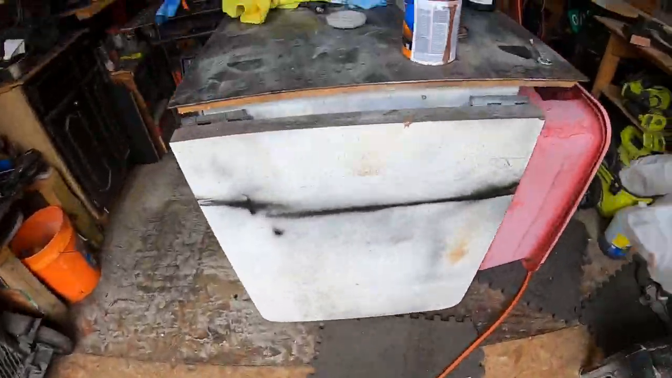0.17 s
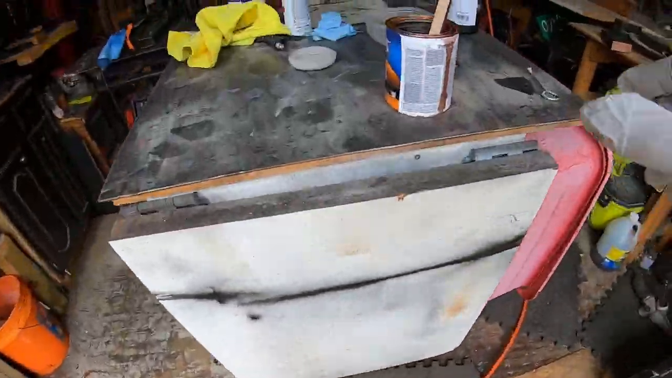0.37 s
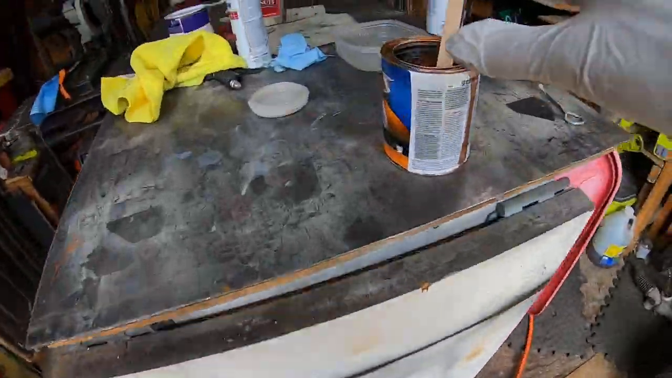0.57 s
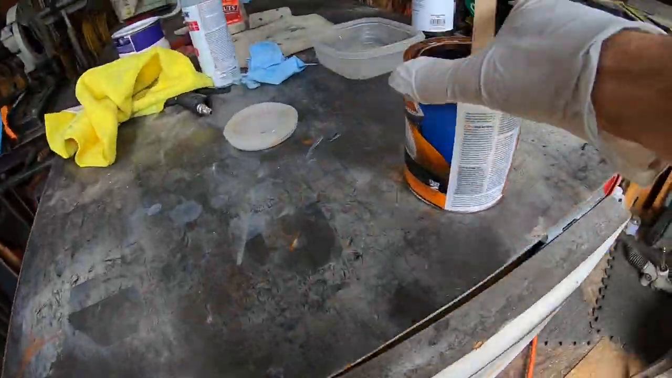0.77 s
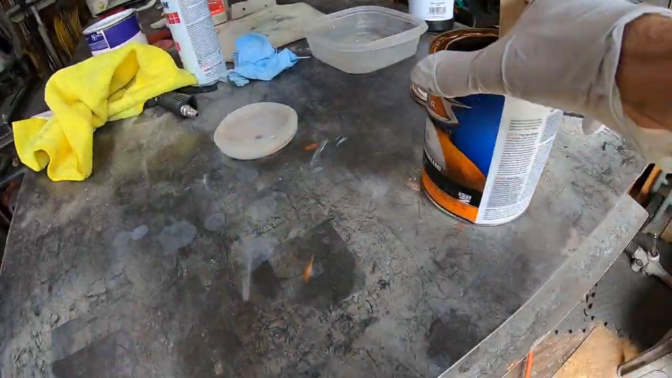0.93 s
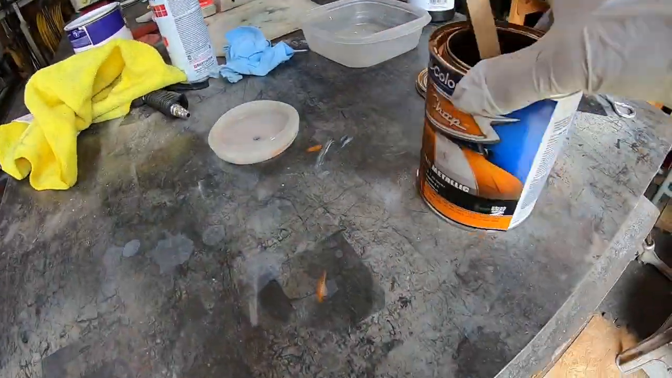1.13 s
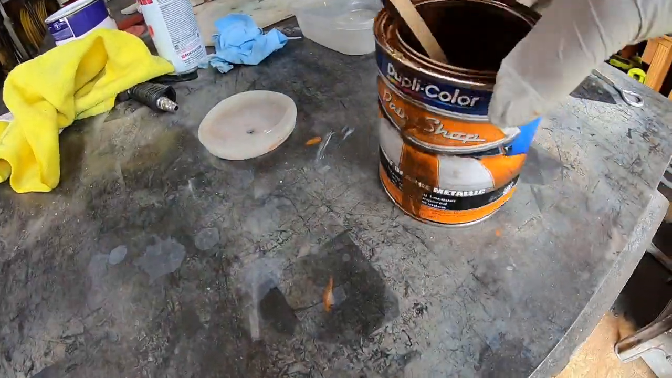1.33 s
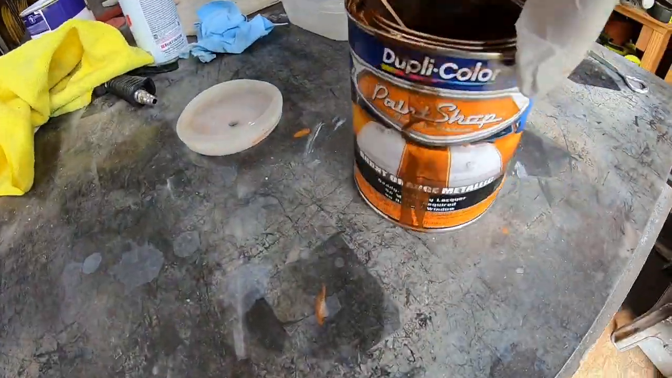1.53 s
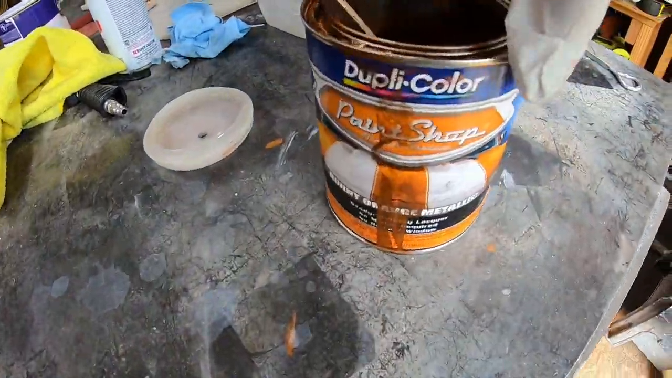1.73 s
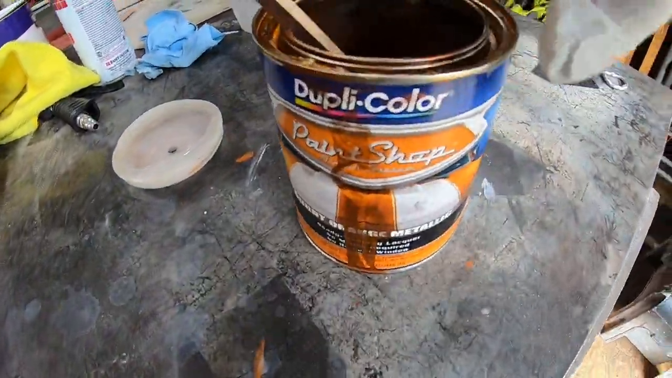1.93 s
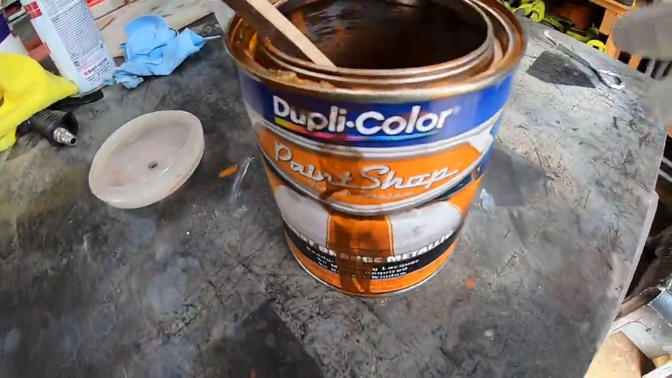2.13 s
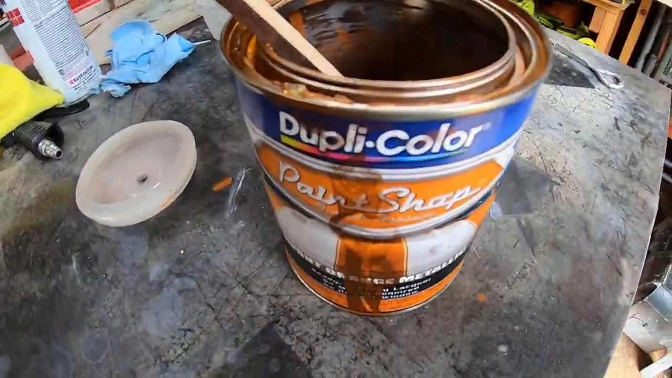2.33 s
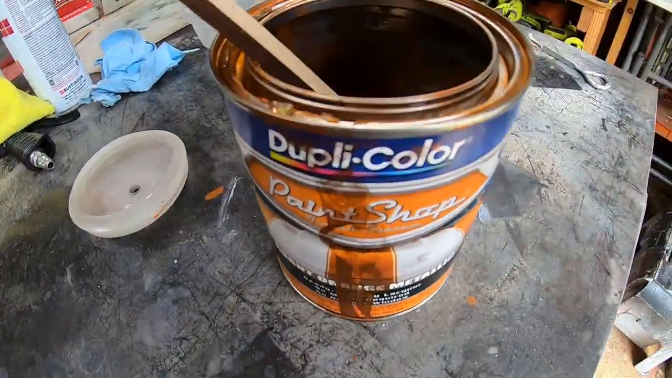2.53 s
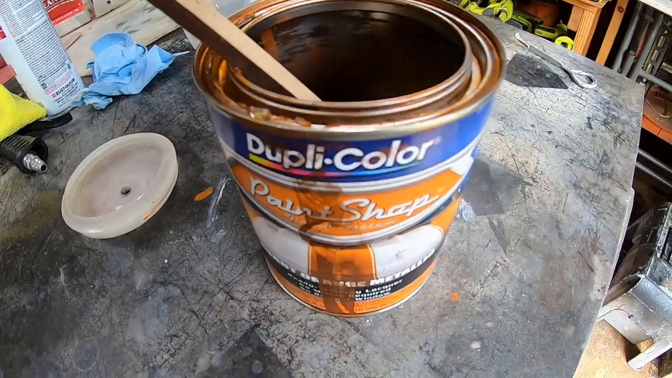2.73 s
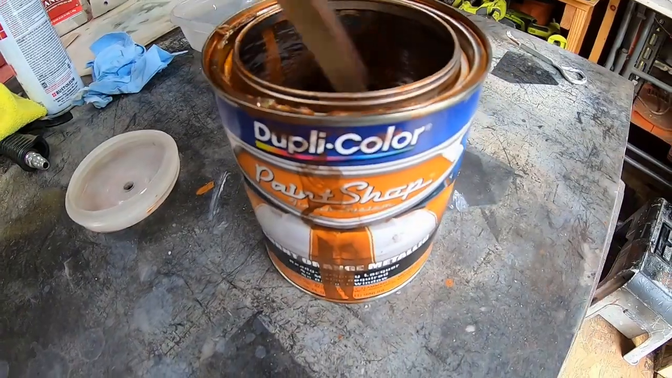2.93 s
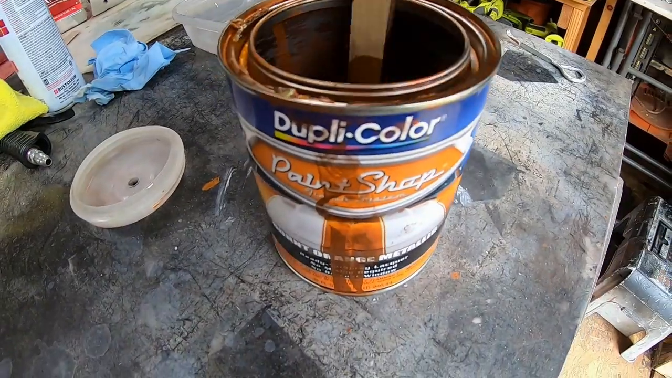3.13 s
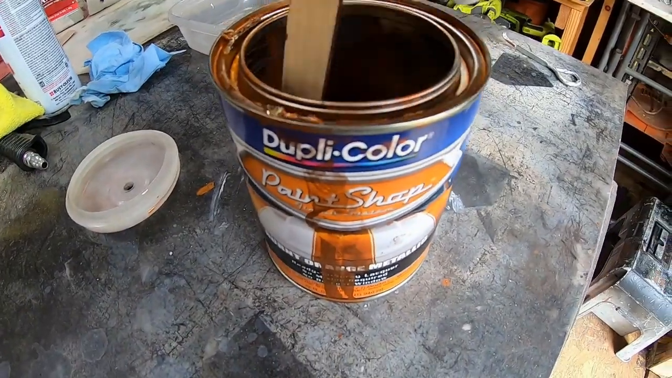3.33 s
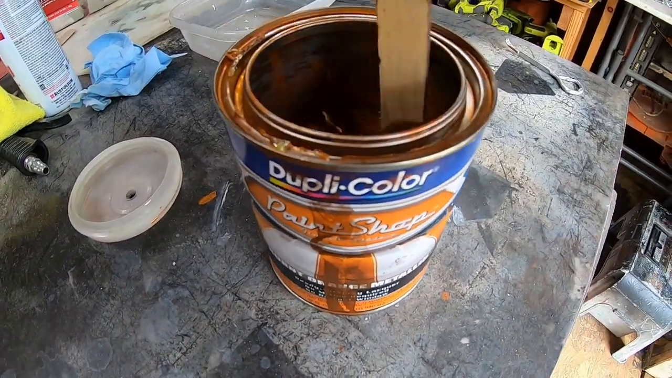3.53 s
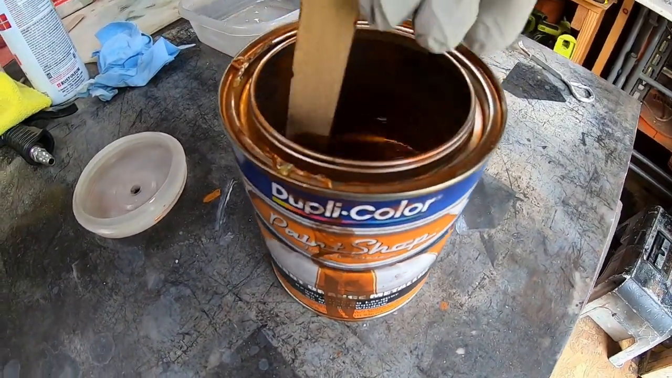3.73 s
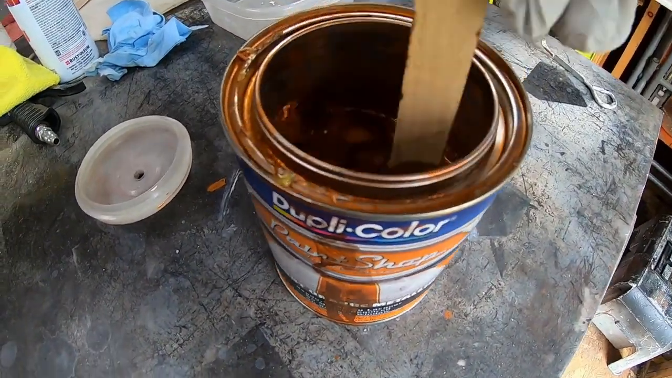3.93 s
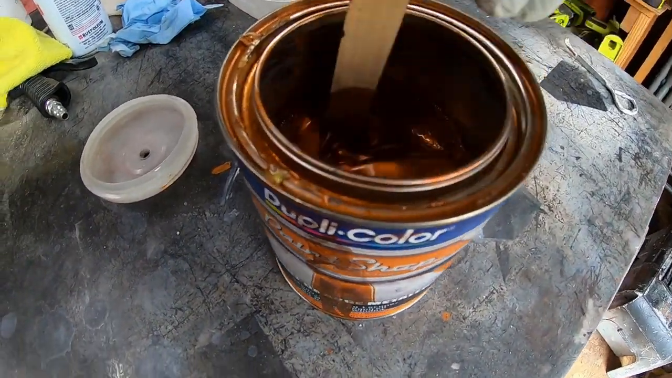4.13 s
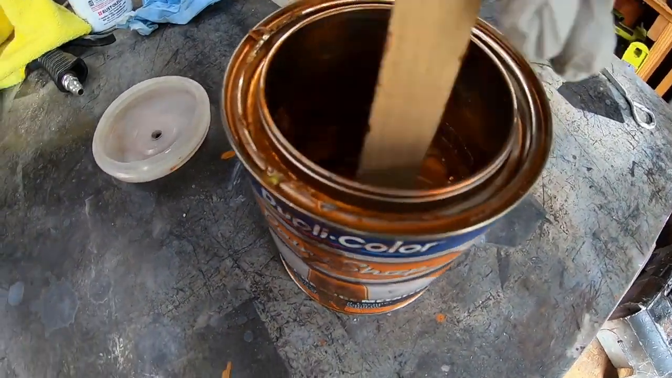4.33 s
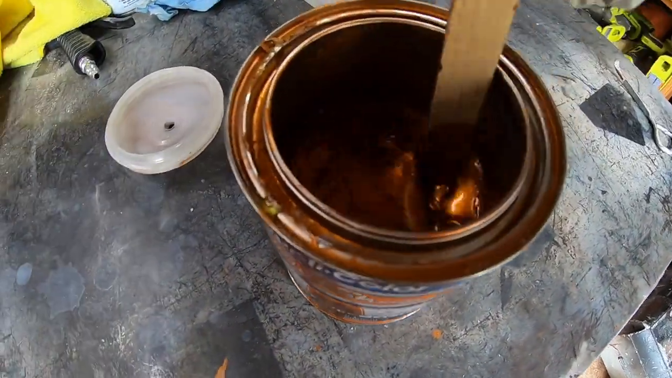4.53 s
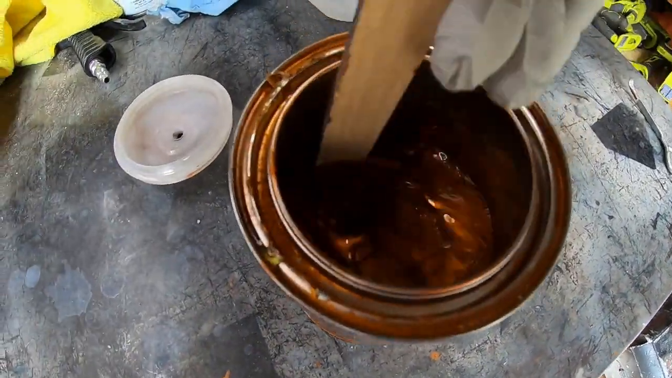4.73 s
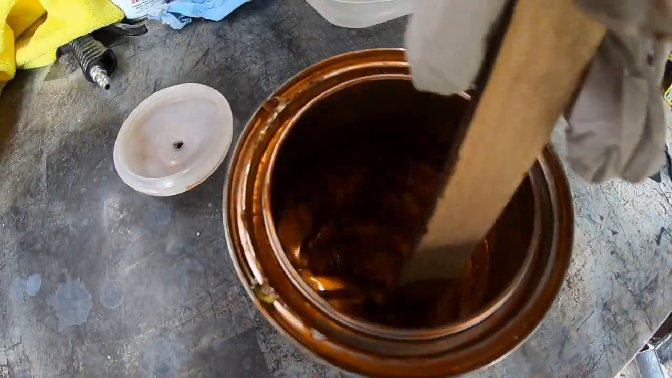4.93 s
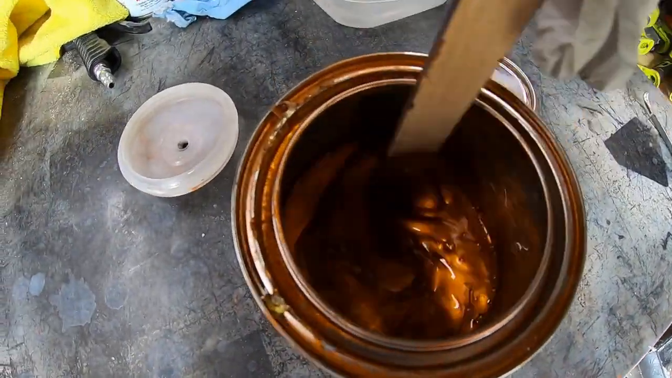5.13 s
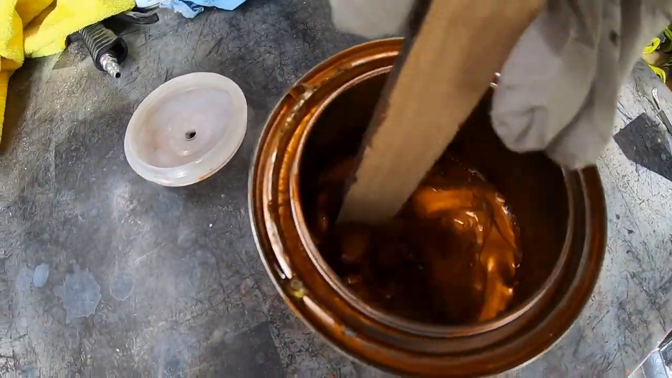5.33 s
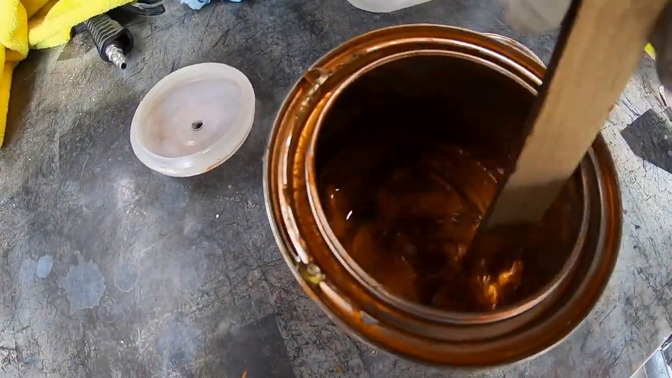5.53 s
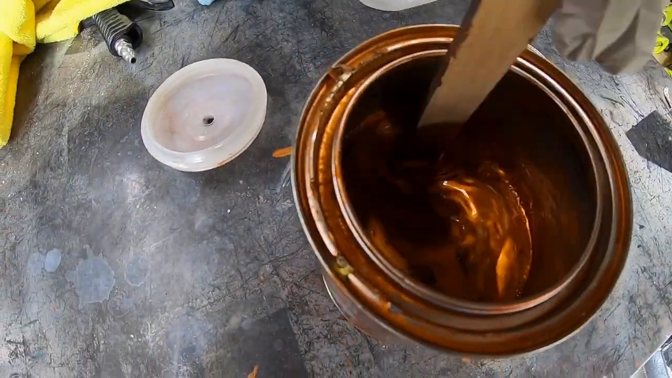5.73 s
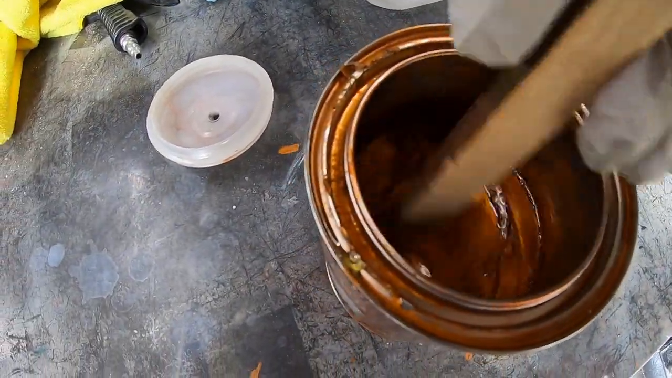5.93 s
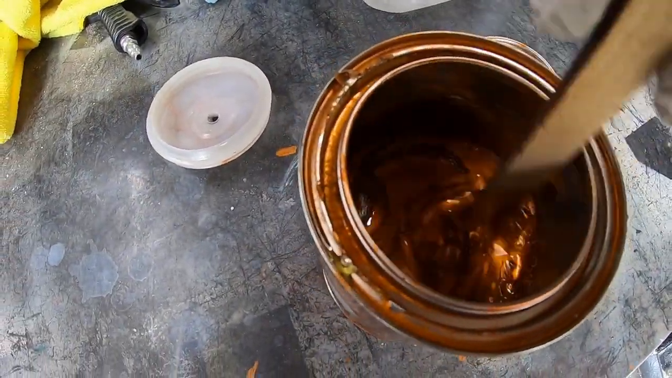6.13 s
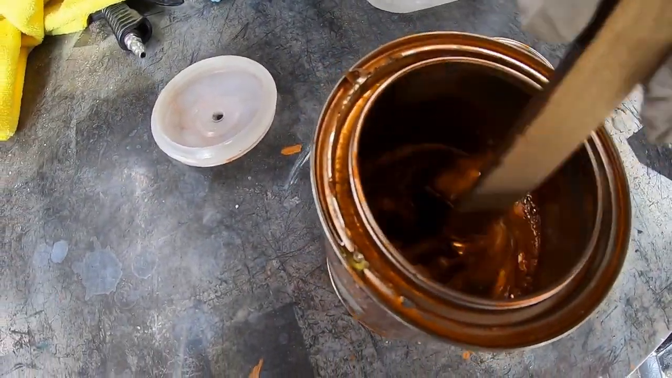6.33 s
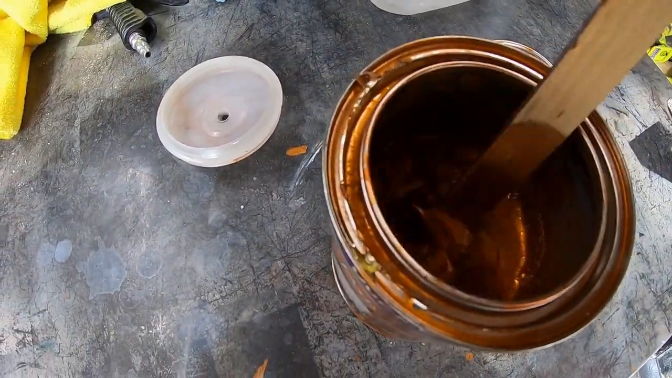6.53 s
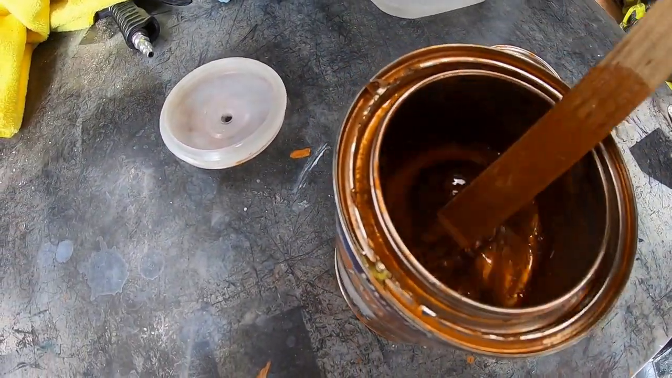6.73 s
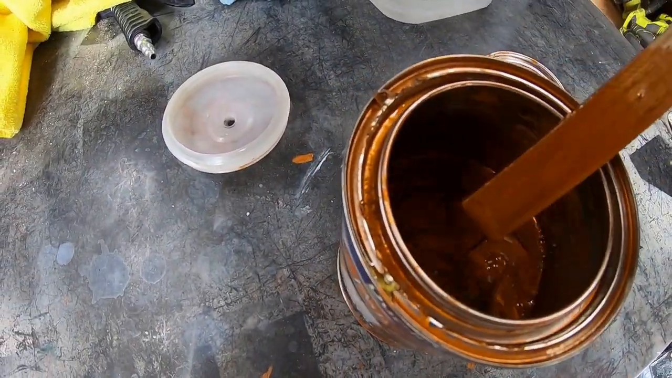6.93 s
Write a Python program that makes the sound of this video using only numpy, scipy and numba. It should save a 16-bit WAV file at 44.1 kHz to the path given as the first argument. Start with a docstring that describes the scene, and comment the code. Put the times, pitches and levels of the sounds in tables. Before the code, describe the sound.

In a garage with a faint low hum, cloth rustles and dull bumps lead to a gloved hand rubbing a metal paint tin. The tin grates over a gritty bench in short ringing shoves, then nearly a second of quiet follows. A wooden stick then stirs thick paint, scraping the inner wall in rhythmic hollow strokes with woody knocks, squelches and sticky pops. Close microphone, small dull room.

```python
"""Garage: a tin of thick paint is dragged across a workbench, then stirred with a wooden stick.
Stick-slip friction, shaped by resonances of the tin and its air, makes the scrapes, drags and rubs.
Decaying modes make the knocks on the tin; gliding sinusoids make the air pockets that pop in the paint.
A glove rubs, clothes rustle and dull bumps sound over a low room hum with a faint hiss and whine."""
import sys
import numpy as np
from scipy import signal
from scipy.fft import rfft, irfft, next_fast_len
from scipy.io import wavfile
from numba import njit

SR = 44100
rng = np.random.default_rng(int(sys.argv[2]) if len(sys.argv) > 2 else 0)


def to_wav(sig):
    """Store sig (one row per channel, or 1-D mono) as 16-bit WAV at the path in sys.argv[1].

    Samples outside -1..1 are clipped; the rate is SR.
    """
    pcm = np.clip(np.atleast_2d(sig), -1, 1) * 32767
    pcm = np.round(pcm).astype(np.int16)
    wavfile.write(sys.argv[1], SR, pcm.T)  # frames by channels


N = 308499
TIME = np.arange(N) / SR
AGE = TIME[:16384]  # time since the onset of a short sound, s

# resonances of the air in the tin: f/Hz, width/Hz, level from the side/dB, level from above/dB
AIR_MODES = [(725, 24, 16.5, 14.5), (1094, 23, 4.5, 12.5), (1378, 46, 16, 6.5), (1847, 69, 13, 12.5),
             (2334, 58, -5.5, 7.5), (2890, 73, 6.5, 7.5), (3350, 57, -3.5, 3.5), (3930, 99, 8, 2),
             (4755, 82, 9.5, 0), (5720, 68, 5, 3), (7500, 62, -12.5, 2)]
# resonances of the tin's bottom: f/Hz, width/Hz, level/dB
BOTTOM_MODES = [(660, 105, 9), (1793, 41, 20), (2525, 60, 11), (2926, 31, 14), (3260, 60, 12.5),
                (3900, 46, 10.5), (4660, 57, 4), (6040, 73, 5)]
# strokes of the stick along the wall: t/s, length/s, relative level/dB, hollow mid-range re that level/dB
WALL_STROKES = [(2.985, 0.082, -60, 6), (3.056, 0.28, -72.5, 8), (3.23, 0.056, -50.5, 10),
                (3.385, 0.44, -55.5, 7.5), (3.51, 0.051, -53.5, 8), (3.63, 0.051, -46.5, 2.5),
                (3.685, 0.091, -50.5, 5.5), (3.795, 0.023, -62, 4.5), (3.885, 0.012, -53, 2.5),
                (3.925, 0.3, -58.5, 8), (4.079, 0.087, -48.5, 0.5), (4.19, 0.12, -61.5, 8.5),
                (4.314, 0.053, -51.5, 5), (4.417, 0.095, -55, 11), (4.517, 0.087, -56.5, 7.5),
                (4.591, 0.19, -48, 5.5), (4.861, 0.073, -51.5, 3), (4.978, 0.11, -53, 4.5),
                (5.101, 0.12, -57, 8), (5.161, 0.057, -47.5, 2), (5.226, 0.15, -54, 5),
                (5.402, .13, -56, 7), (5.544, 0.059, -49.5, 7), (5.62, 0.16, -42.5, 2.5),
                (5.814, 0.075, -47, 5.5), (5.927, 0.06, -52, 0), (6.05, 0.088, -55, 4),
                (6.1, 0.058, -48, 5.5), (6.147, 0.14, -54.5, 7), (6.27, 0.13, -49, -1.5),
                (6.43, 0.1, -52, 6), (6.488, 0.022, -37, -8), (6.61, 0.02, -60.5, 0)]


def undb(db):
    """Amplitude gain is 10 to the power of level/20."""
    return 10 ** (np.asarray(db) / 20)


def unit(x):
    """Normalisation to a root-mean-square of 1."""
    return x / np.sqrt(np.mean(x ** 2))


def curve(rows):
    """Linear interpolation between (t/s, value) points."""
    return np.interp(TIME, *np.transpose(rows))


def colour(x, points):
    """Minimum-phase filtering: the folded cepstrum of the (f/Hz, level/dB) curve gives a causal response."""
    size = next_fast_len(len(x) + 2048, True) // 2 * 2
    hz, db = np.transpose(points)
    grid = np.maximum(np.arange(size // 2 + 1) * SR / size, 1)
    log_gain = np.log(undb(np.interp(np.log(grid), np.log(hz), db)))
    cepstrum = irfft(log_gain)
    cepstrum[1:size // 2] *= 2
    cepstrum[size // 2 + 1:] = 0
    response = np.exp(rfft(cepstrum))
    return irfft(rfft(x, size) * response)[:len(x)]


def walk(rate):
    """Random modulation, slow or fast with the rate in knots/s: Gaussian knots joined by lines, spread near 1."""
    knots = rng.standard_normal(8192)
    return np.interp(TIME * rate, np.arange(len(knots)), knots) * np.sqrt(3 / 2)


def pan(x, db):
    """Intensity stereo: the left-minus-right level difference places a mono sound."""
    return np.array([x * undb(db / 2), x * undb(-db / 2)])


def add(track, s, sound):
    """Linear superposition of a sound that starts at s."""
    start = max(int(s * SR), 0)
    track[..., start:start + sound.shape[-1]] += sound[..., :N - start]


@njit
def resonate(x, hz, width):
    """Second-order resonance as a state-variable band-pass: movable centre, unit gain at the centre."""
    y, band, low = np.empty(len(x)), 0., 0.
    for i in range(len(x)):
        g, damping = np.tan(np.pi * hz[i] / SR), width / hz[i]
        v = (band + g * (x[i] - low)) / (1 + g * (g + damping))
        band, low, y[i] = 2 * v - band, low + 2 * g * v, damping * v
    return y


def narrow_noise(hz, width):
    """Band-limited noise: two equal resonances in cascade, the more tonal the narrower they are."""
    once = resonate(rng.standard_normal(len(hz)), hz, width)
    return unit(resonate(once, hz, width))


def friction(grit_db, judder_db, judder_rate):
    """Stick-slip excitation: noise whose level wanders quickly (grit) and slowly (judder) bunches the slips."""
    level_db = grit_db * walk(1100) + judder_db * walk(judder_rate)
    return unit(rng.standard_normal(N) * undb(level_db))


def effort(rows, attack_s, release_s, swell_db):
    """Powers of (t/s, length/s, level/dB) movements add; each sets in, swells (or dips) mid-way and decays."""
    power, age = np.zeros(N), TIME[:SR]
    for s, length_s, db in rows:
        swell = undb(swell_db * (np.sin(np.pi * np.minimum(age / length_s, 1)) - 0.5))
        shape = np.minimum(age / attack_s, 1) * swell * np.exp(-np.maximum(age - length_s, 0) / release_s)
        add(power, s, (undb(db) * shape) ** 2)
    return np.sqrt(power)


def stirring():
    """Friction grows with hand pressure: gains for the hiss at the wall and for the hollow of the tin."""
    s, length_s, db, hollow_db = np.transpose(WALL_STROKES)
    # a positive swell: the hand presses hardest in mid-stroke
    return [effort(zip(s, length_s, level), attack_s=0.011, release_s=0.029, swell_db=1.5)
            for level in (db, db + hollow_db)]


def moving_echo(x, lag_s, sway, gain):
    """Comb filtering by a reflection from the far wall, and its repeat, as the path length wanders."""
    lag = lag_s * (1 + sway * walk(5.9))
    first = np.interp(TIME - lag, TIME, x)
    second = np.interp(TIME - 2 * lag, TIME, x)
    return x + gain * first + gain ** 2 * second


def scrape(pressure, drive, grit_db=3, judder_db=3, shift=0.03, wobble=0.016, flutter_db=4,
           wall_db=-3, hollow_db=0.5, hiss_db=6.0):
    """Friction excites cavity resonance: each turn bends all air modes together, the heaving paint each one."""
    # wood on the wet wall: f/Hz, level/dB
    wall_colour = [(200, -25), (450, -33), (720, -11.5), (1050, -12.5), (1500, -15.5), (2000, -11),
                   (2900, -2), (4000, -7), (5200, -11.5), (7500, -10.5), (10000, -14), (11300, -28),
                   (14000, -27.5), (16000, -47)]
    # the listening point moves over the mouth of the tin: t/s, share of the way
    overhead = [(4.1, 0), (4.9, 1)]
    turns_hz, turn_start_s = 2.01, 3.45  # at turn_start_s the stick passes the right-hand wall
    slips = colour(friction(grit_db, judder_db, 55), wall_colour)
    sound = moving_echo(slips, lag_s=.0019, sway=.07, gain=.6) * undb(wall_db)
    above = curve(overhead)
    turn = np.cos(2 * np.pi * turns_hz * (TIME - turn_start_s))
    for hz, width, side_db, above_db in AIR_MODES:
        db = side_db + above * (above_db - side_db)
        bend = shift * turn + wobble * np.sqrt(3000 / hz) * walk(22)
        # the contact point wanders, so each resonance is fed more or less
        feed = undb(db + flutter_db * walk(20))
        sound = sound + feed * resonate(slips, hz * (1 + bend), float(width))
    hollow = signal.sosfilt(signal.butter(3, 3700, fs=SR, output="sos"), sound)
    hiss = signal.sosfilt(signal.butter(3, 3900, "high", fs=SR, output="sos"), sound)
    return pressure * unit(hiss) * undb(hiss_db) + drive * unit(hollow) * undb(hollow_db)


def sing():
    """Steady rubbing makes a single resonance stand out: narrow-band noise slides in pitch along the wall."""
    # singing rubs: t/s, length/s, relative level/dB, starting f/Hz, glide/(Hz/s)
    rubs = [(3.037, 0.17, -60, 1362, -520), (3.53, 0.038, -49, 4350, -5000),
            (3.559, 0.016, -41, 2920, -2500), (3.71, 0.034, -41, 3013, -4500),
            (3.887, 0.16, -62.5, 1420, -380), (4.098, 0.031, -53.5, 755, 1500),
            (4.355, 0.026, -43, 2900, 304), (4.457, 0.055, -50, 3020, -2500),
            (5.023, 0.062, -47, 2578, -4000), (5.038, 0.031, -43, 1754, 1500),
            (5.176, 0.062, -48, 2825, 2504), (5.421, 0.049, -49.5, 2380, -1500),
            (6.1, 0.029, -54, 2945, -6000), (6.3, 0.087, -48.5, 3005, -1800),
            (6.475, 0.083, -53, 1910, -4000)]
    width = 74.0  # Hz, of each of the two resonances in cascade
    out = np.zeros(N)
    for s, length_s, db, hz, glide in rubs:
        pitch = hz + glide * np.clip(TIME - s, 0, length_s)
        gain = effort([(s, length_s, db)], attack_s=0.0051, release_s=0.015, swell_db=11)
        out += narrow_noise(pitch, width) * gain
    return out


def blows(rows, ringing, crack_db, crack_s, chatter, body_db, mid_db, edge_db, thud_db):
    """Impact excites damped modes: a tick and brief chatter drive them, and three bands set body and edge."""
    # the bare tick of the contact: f/Hz, level/dB
    crack_colour = [(150, 1.5), (230, 3), (400, -5.5), (600, 1.5), (1000, 1.5), (10000, 3)]
    favour_db, favour_octaves = 9.5, 0.068  # lift and reach of the modes that a struck spot favours
    out = np.zeros(N)
    hz, db, t60 = np.transpose(ringing)[:, :, None]
    bands = [signal.butter(3, edges, "band", fs=SR, output="sos")
             for edges in ((180, 1100), (1100, 4500), (4500, 10000))]
    attack = AGE < .015
    for s, level_db, body, edge, chatter_s, spot_hz, ring in rows:
        # the shifting paint loads the wall and detunes the low modes most
        detune = 1 + .015 * (1000 / hz) ** .8 * rng.standard_normal(hz.shape)
        lift_db = favour_db * np.exp(-(np.log2(hz / spot_hz) / favour_octaves) ** 2)
        decay = undb(db + lift_db - 60 * AGE / (t60 * ring))
        cycles = hz * detune * AGE + rng.random(hz.shape)
        modes = np.sum(decay * np.sin(2 * np.pi * cycles), axis=0)
        crack = colour(rng.standard_normal(len(AGE)) * np.exp(-AGE / (crack_s * ring)), crack_colour)
        push = chatter * rng.standard_normal(len(AGE)) * np.exp(-AGE / max(chatter_s, 1e-4))
        push[0] = 1
        sound = signal.fftconvolve(push, modes + undb(crack_db) * crack)[:len(AGE)]
        parts = [signal.sosfilt(band, sound) for band in bands]
        weights = undb([body + body_db, mid_db, edge + edge_db])
        sound = sum(weight * part / np.std(part[attack]) for part, weight in zip(parts, weights))
        # the bench gives a little under the blow
        thud = np.sin(2 * np.pi * rng.uniform(54.0, 197) * AGE) * np.exp(-AGE / 0.012)
        add(out, s, (sound + undb(body + thud_db) * thud) * undb(level_db))
    return out


def knocks():
    """Modal ringing of the loaded tin where the stick strikes its wall."""
    # stick on wall: t/s, relative level/dB, relative body/dB, relative edge/dB, chatter/s,
    # favoured f/Hz, factor on the ring time
    strikes = [(3.0015, -52, 2, -22, 0.012, 2870, 1), (3.014, -51, -11, -10, .003, 3865, .6),
               (3.0302, -57.5, 16, -14, 0.0032, 739, 0.74), (3.2385, -29.5, -4.5, -27.5, 0.001, 1825, 0.74),
               (3.2615, -41, -3, -13, 0.0041, 4550, 0.46), (3.3135, -38.5, 7.5, -23, 0.001, 2890, 0.68),
               (3.3175, -35.5, 1.5, -37, 0.0017, 2860, .8), (3.4325, -34.5, 2.5, -14.5, 0.0021, 2258, 0.7),
               (3.4405, -37.5, -1, -23, 0.0045, 3130, 0.82), (4.2273, -45, -7, -10.5, 0.0012, 2258, 0.65),
               (4.2707, -34, 1.5, -13.5, 0.0016, 640, 0.67), (4.3617, -40.5, -33, -17, 0.0085, 3865, 0.8),
               (4.4105, -41.5, -9, -14, 0.00056, 1895, 0.93), (4.4994, -44, -10, -16, 0.0024, 3100, .4),
               (4.5353, -43, 10, -22.5, .0003, 1880, 0.65), (4.6575, -38.5, 3.5, -20, 0.0034, 2258, 0.55),
               (4.7573, -38, -1, -25, 0.0075, 2770, 0.59), (4.792, -30, 0, -13, 0.0012, 1895, 0.72),
               (4.7955, -31.5, -6.5, -20, .0006, 2800, 0.19), (4.8755, -50.5, 12.5, -8, .003, 724, .7),
               (5.1117, -45.5, -18, -4, 0.0024, 3865, 0.22), (5.2801, -46, -5, -24, 0.002, 2890, 0.75),
               (5.3218, -51.5, -18, 2, 0.00055, 4510, 0.45), (5.3481, -38, 5, -16, 0.0018, 2258, 0.66),
               (5.5757, -39.5, 5.5, -12.5, 0.00075, 1085, 0.19), (5.627, -38, 6, -19, 0.0033, 1363, 0.27),
               (5.7373, -35, -2.5, -21, 0.0043, 3840, 0.46), (5.8686, -30, 1, -17, 0.0011, 735, 0.4),
               (5.8767, -36, 1.5, -12.5, 0.0012, 1924, 0.37), (5.895, -35.5, -16, -16, 0.0017, 2910, 0.37),
               (5.8996, -36.5, -24, -7.5, 0.00034, 2258, 0.17),
               (5.9437, -39.5, -7, -12.5, 0.0012, 2980, 0.84), (6.1805, -39, 6, -25, 0.00097, 1895, 0.51),
               (6.4969, -44, -14, 0, 0.014, 1716, 0.93), (6.5505, -50, -17, 4, .002, 4700, 0.33)]
    # modes of the loaded tin: f/Hz, level/dB, t60 before the strike's factor/s
    tin_modes = [(284, -10, 0.066), (557, -10, 0.15), (645, -4, 0.17), (724.6, -6.5, 0.21),
                 (906, -24, 0.045), (1082, -14, 0.16), (1344, -5.5, 0.11), (1667, -4.5, 0.13),
                 (1895, 0.5, 0.14), (2265, -3, 0.16), (2620, 8.5, 0.019), (2876, 5, 0.11),
                 (3000, 9.5, 0.067), (3180, -16, 0.074), (3850, 6.5, 0.057), (4736, 0.5, 0.044),
                 (4700, -15, 0.059), (5720, 7, 0.039), (6600, 17, 0.018), (7290, 13.5, 0.045),
                 (7850, 7.5, 0.13), (9700, 4, 0.1017)]
    return blows(strikes, tin_modes, crack_db=12.0, crack_s=0.011, chatter=0.068,
                 body_db=-0.5, mid_db=4.5, edge_db=10.0, thud_db=-11.0)


def bubble(hz, swell_s, decay_s, glide, snap=0.24, snap_width=0.61):
    """Pocket resonance: a short ring whose pitch glides as the pocket opens, with a wet noisy snap around it."""
    age = AGE[:2048]
    pitch = hz * (1 + glide * (np.tanh(age / (swell_s + decay_s)) - .6))
    spray = narrow_noise(pitch, hz * snap_width)
    swell = np.sin(np.pi / 2 * np.minimum(age / swell_s, 1))
    envelope = swell * np.exp(-np.maximum(age - swell_s, 0) / decay_s)
    return envelope * (np.sin(2 * np.pi * np.cumsum(pitch) / SR) + snap * spray)


def pops(hollow_db=-3, overtone=2.9, overtone_db=-20, tear_db=-17, tear_s=0.0014):
    """Bursting pockets: the film tears with a click, the pocket rings with an overtone and stirs the tin's air."""
    # air pockets: t/s, relative level/dB, f/Hz, swell/s, decay/s, glide as a share of f
    pockets = [(3.5897, -32.5, 1770, .001, 0.0063, 0.21), (3.5882, -35, 1050, 0.0011, 0.0065, 0.14),
               (3.607, -31.5, 2190, 0.0037, 0.0051, 0.27), (3.6275, -29, 2720, .002, 0.0042, 0.072),
               (3.757, -33, 3480, 0.0019, .003, 0.041), (3.769, -35, 2760, 0.0022, 0.0035, -0.21),
               (3.776, -29, 4460, 0.0016, 0.0016, 0.088), (3.782, -30, 4050, .002, .003, 0.0057),
               (4.4093, -26, 1530, 0.0012, 0.0072, 0.4), (4.4097, -29, 2730, .0006, 0.0037, 0.033),
               (4.433, -36.5, 2690, 0.0077, 0.003, 0.44), (4.5035, -27, 634, 0.0013, 0.0023, 0.013),
               (4.535, -28, 720, 0.00045, 0.0045, -0.6), (4.8244, -30, 7800, .0005, 0.0044, 0.17),
               (4.8287, -28, 2540, 0.0012, 0.0025, -.2), (4.8348, -15.5, 3180, 0.0027, 0.0027, 0.16),
               (4.8347, -26, 2254, .001, 0.0056, 0.052), (4.8537, -26, 3500, .0005, 0.0042, 0.21),
               (4.852, -30, 2380, .0005, 0.0028, -0.055), (4.942, -40, 870, 0.0026, 0.0055, 0.054),
               (4.975, -40, 2260, 0.0016, 0.0036, 0.35), (5.017, -39, 2720, 0.0019, 0.0035, -0.22),
               (5.038, -34, 2260, 0.002, 0.003, 0.053), (5.0469, -34.5, 1794, 0.002, 0.006, -0.045),
               (5.054, -27, 2540, 0.00091, 0.0025, .05), (5.063, -34, 2070, 0.002, 0.004, 0.19),
               (5.3202, -30, 3850, 0.00092, 0.0026, 0.11), (5.349, -33, 630, 0.0083, 0.012, -0.34),
               (5.5915, -30, 637, 0.0024, 0.01, -0.22), (6.124, -29, 2490, 0.0031, 0.0039, 0.15),
               (6.1333, -21, 2360, 0.00072, 0.0027, -0.0011), (6.133, -36, 1390, .001, 0.0039, -0.21),
               (6.2098, -20, 2970, 0.00083, 0.0012, 0.3), (6.3873, -14.5, 3620, 0.00077, 0.0013, 0.3),
               (6.392, -18.5, 4060, 0.00044, 0.0019, -0.43), (6.4, -28, 3100, 0.0016, 0.0022, -0.062),
               (6.5038, -27, 2430, .002, 0.005, -0.22), (6.551, -21.5, 2584, 0.0019, 0.0042, -0.059),
               (6.6038, -20.5, 3360, 0.00086, 0.0022, 0.013), (6.629, -43, 2520, .001, 0.0017, -0.12),
               (6.653, -27.5, 2670, 0.001, 0.0036, 0.067), (6.652, -42, 1570, 0.0011, 0.0089, 0.1),
               (6.6827, -47, 3620, 0.0012, 0.0037, 0.14), (6.7234, -45.5, 2580, 0.00045, 0.0028, 0.29),
               (6.725, -48.5, 4400, 0.00045, .003, 0.053), (6.7588, -39.5, 2410, .001, 0.0039, 0.1),
               (6.76, -41.5, 3580, .0007, 0.003, 0.04), (6.7705, -35.5, 2486, 0.00058, 0.0068, 0.095),
               (6.8054, -42, 3630, 0.00073, 0.0023, 0.013)]
    out, age = np.zeros(N), AGE[:2048]
    for s, db, hz, swell_s, decay_s, glide in pockets:
        upper = bubble(min(hz * overtone, 9000), swell_s / 2, decay_s / 2, glide)
        tear_colour = [(hz / 4, -20), (hz, 0), (hz * 3, -8), (hz * 6, -30)]
        tear = unit(colour(rng.standard_normal(len(age)), tear_colour)) * np.exp(-age / tear_s)
        ring = bubble(hz, swell_s, decay_s, glide)
        add(out, s, undb(db) * (ring + undb(overtone_db) * upper + undb(tear_db) * tear))
    hollow = sum(resonate(out, np.full(N, float(hz)), float(width)) for hz, width, *_ in AIR_MODES)
    return out + undb(hollow_db) * hollow


def squelch(drive, level_db=-9.0, spread_db=4.0, centre_hz=3100, octaves=2.2, cycles=11, glide=.1, count=3000):
    """Superposed random bursts: a fizz of tiny gliding pockets, louder the harder the stick is pushed."""
    out, age = np.zeros(N), AGE[:1024]
    first, last = WALL_STROKES[0][0], WALL_STROKES[-1][0] + WALL_STROKES[-1][1]
    for when, pitch, size, length, slide in rng.random((count, 5)):
        hz = centre_hz * 2 ** (octaves * (pitch - .5))
        life = age * hz / (cycles * (.5 + length))  # high pitches die faster
        bend = 1 + glide * (2 * slide - 1) * np.tanh(life)
        ring = np.sin(2 * np.pi * np.cumsum(hz * bend) / SR)
        gain = undb(-spread_db * np.log(size + .02))  # few loud, many faint
        add(out, first + when * (last - first), gain * np.sqrt(life) * np.exp(-life) * ring)
    return unit(out) * drive * undb(level_db)


def slosh(level_db=4.0, lumps_db=3):
    """Lumpy viscous flow as low-coloured noise: thick paint folds over behind the blade in soft gulps."""
    # folds of the paint: t/s, length/s, relative level/dB
    folds = [(3.58, 0.022, -55.5), (3.68, 0.041, -63.5), (4.24, 0.3, -52), (4.52, 0.2, -51),
             (4.77, 0.076, -43.5), (4.87, 0.039, -46.5), (5.02, 0.037, -53.5), (5.25, 0.17, -53.5),
             (5.6, 0.28, -54.5), (5.945, 0.013, -43.5), (6.17, 0.09, -53.5), (6.45, 0.075, -59.5)]
    # their soft, low colour: f/Hz, level/dB
    fold_colour = [(130, -37), (280, -7), (430, -4), (560, -7.5), (680, 6.5), (900, -5.5), (1300, -9),
                   (3000, -32.5)]
    flow = effort(folds, attack_s=0.016, release_s=0.028, swell_db=-3)
    return unit(colour(friction(3.6, lumps_db, 60), fold_colour)) * flow * undb(level_db)


def drag(grit_db=1.5, judder_db=3, level_db=5.0, wobble=.012, flutter_db=4):
    """Stick-slip of the rim on the bench sounds the bottom; as it rocks, upper modes shift and take turns."""
    # shoves of the tin over the bench: t/s, length/s, relative level/dB
    shoves = [(1.088, 0.049, -44), (1.195, 0.087, -44), (1.413, 0.011, -44), (1.475, 0.088, -52.5),
              (1.622, 0.098, -44.5), (1.795, 0.0085, -52.5), (1.92, 0.017, -69)]
    # steel on grit: f/Hz, level/dB
    rim_colour = [(29, -90), (50, -15), (81, 7.5), (175, -13), (258, 1), (472, -18), (661, -7), (1500, -2),
                  (1780, -15.5), (2110, -10), (3250, -11.5), (9410, -12.5), (16000, -34)]
    slips = colour(friction(grit_db, judder_db, 90), rim_colour)
    sound = slips
    for hz, width, db in BOTTOM_MODES:
        reach = min(hz / 4000, 1)
        feed = undb(db + flutter_db * reach * walk(30))
        centre = hz * (1 + wobble * reach ** 2 * walk(25))
        sound = sound + feed * resonate(slips, centre, float(width))
    return unit(sound) * effort(shoves, attack_s=0.0037, release_s=0.055, swell_db=2.5) * undb(level_db)


def catches():
    """Modal ringing as the rim catches: bandwidth sets the basic decay time, each catch shortens or lengthens it."""
    # rim on bench: t/s, relative level/dB, relative body/dB, relative edge/dB, chatter/s,
    # favoured f/Hz, factor on the ring time
    snags = [(1.0914, -41.5, 4, -26, 0.0041, 3850, 0.39), (1.1274, -40.5, -11, -7, 0.0038, 3280, 0.9),
             (1.1462, -39, -18, -17, 0.0036, 1790, 1.9), (1.1988, -46.5, 11, -23, 0.0063, 660, 1.2),
             (1.2125, -35, 3.5, -22, 0.0021, 1790, 1.5), (1.2248, -33, 2, -11.5, 0.0063, 1790, 1.4),
             (1.2382, -38.5, 8, -24, 0.0027, 660, 2.5), (1.2899, -40.5, 7, -3, 0.0031, 660, 0.67),
             (1.3045, -38.5, 0.5, -5.5, 0.0018, 3280, 1.2), (1.365, -43.5, -4, -28, .0015, 1790, 0.78),
             (1.4202, -44, 4.5, -3, 0.0049, 1790, 0.78), (1.507, -40.5, -22, -14, 0.0056, 3280, 0.73),
             (1.516, -50, -7, -9, .004, 3850, 1.3), (1.5325, -51, -3, 3, 0.0028, 4640, 0.57),
             (1.5974, -46.5, -7, -2, 0.0001, 2930, 0.097), (1.6212, -38.5, 2.5, 0.5, 0.0013, 1790, 0.32),
             (1.7039, -46, 6.5, -5, 0.0055, 2520, 0.87), (1.732, -39.5, 1, -3, 0.002, 3850, 0.93),
             (1.7373, -35.5, 3.5, -1.5, 0.0034, 668, 0.61), (1.8061, -45, 2.5, -8, 0.01, 2520, 0.68),
             (1.821, -55, -2, 5, 0.0052, 2520, 0.84), (1.8788, -56.5, -8, -2, .0015, 3850, .6),
             (2.104, -76, 16.5, -2, 0.00082, 660, 0.53)]
    bottom = [(hz, db, np.log(1000) / (np.pi * width)) for hz, width, db in BOTTOM_MODES]
    return blows(snags, bottom, crack_db=24.0, crack_s=0.0096, chatter=0.11,
                 body_db=0, mid_db=0.0, edge_db=0.5, thud_db=-15.5)


def handling(rub_db=0, rustle_db=0, side_db=-4.5):
    """Soft friction as filtered noise: the glove takes the tin and lets go, and the clothes rustle."""
    # rubs of the glove: t/s, length/s, relative level/dB
    grips = [(.84, 0.12, -54), (.97, 0.39, -48.5), (1.91, 0.12, -61)]
    # movements in the clothes: t/s, length/s, relative level/dB
    moves = [(.01, 0.043, -52), (.1, 0.2, -73), (.6, 0.013, -47), (.66, 0.13, -57.5)]
    # glove on tin, then cloth: f/Hz, level/dB
    rub_colour = [(250, -23), (480, -16), (660, -8.5), (850, -23), (1300, -32.5), (3000, -43.5),
                  (9000, -53)]
    rustle_colour = [(200, -1), (600, -4), (1400, -2.5), (2300, -6.5), (5600, -14), (9000, -12.5),
                     (15000, -47)]
    rub = unit(colour(friction(0.71, 1.7, 43.86), rub_colour))
    rub = rub * effort(grips, attack_s=0.018, release_s=0.11, swell_db=2)
    rustle = unit(colour(friction(1.3, 0.42, 59.0), rustle_colour))
    rustle = rustle * effort(moves, attack_s=0.0092, release_s=0.044, swell_db=5)
    return pan(undb(rub_db) * rub + undb(rustle_db) * rustle, side_db)


def bumps(rumble=1.0, onset_s=0.0067):
    """Heavy damping leaves only a dull thud: a fast-decaying low sinusoid with noise around it."""
    # bumps of floor and bench: t/s, relative level/dB, f/Hz, decay/s
    impacts = [(.01, -47, 124.6, 0.11), (0.605, -30, 101.4, 0.051), (0.634, -29, 92.4, 0.022),
               (0.683, -39.5, 109, 0.047), (1.099, -40, 93.3, 0.06), (1.203, -40, 191, 0.025),
               (1.293, -42, 126, 0.016), (1.744, -29, 85, 0.017), (2.11, -35.5, 48.6, 0.014),
               (3.028, -42.5, 79.6, 0.025), (4.976, -40, 43.5, 0.022)]
    out = np.zeros(N)
    for s, db, hz, decay_s in impacts:
        thud_colour = [(hz / 4, -12), (hz, 0), (hz * 2, -8), (hz * 8, -50), (hz * 20, -80)]
        thud = unit(colour(rng.standard_normal(len(AGE)), thud_colour))
        envelope = (1 - np.exp(-AGE / onset_s)) * np.exp(-AGE / decay_s)
        add(out, s, undb(db) * envelope * (np.sin(2 * np.pi * hz * AGE) + rumble * thud))
    return out


def garage(dry, near_db=-11, room_db=-23, room_t60=0.47):
    """Reverberation by convolution: early reflections differ left and right, a short dull tail follows."""
    near_lag_s, near_t60_s = .001, .025  # first reflections, from tin and bench
    near = rng.standard_normal(len(AGE)) * undb(-60 * AGE / near_t60_s) * (AGE > near_lag_s)
    near = unit(near) / np.sqrt(len(AGE))
    near = colour(near, [(150, -3.5), (600, -4.5), (1200, 6.5), (2600, -4.0), (5000, 2.0), (9000, 0.5)])
    side = undb(near_db) * signal.fftconvolve(dry.mean(axis=0), near)[:N]
    out = []
    for channel in (dry[0] + side, dry[1] - side):
        tail = colour(rng.standard_normal(len(AGE)), [(700, 14.5), (4000, -6.5), (12000, -15.0)])
        tail = unit(tail * undb(-60 * AGE / room_t60) * (AGE > .004)) / np.sqrt(len(AGE))
        out.append(channel + undb(room_db) * signal.fftconvolve(channel, tail)[:N])
    return np.array(out)


def ambience(hum_hz=150, hum_width_hz=18, hum_db=-65, spread_db=-9):
    """Mid-side noise with similar bass left and right; narrow-band noise hums and a sinusoid whines."""
    # background of the garage: f/Hz, level/dB
    room_colour = [(25, -25), (60, -25), (108, -29), (150, -23), (200, -17), (300, -28), (400, -39),
                   (560, -37), (760, -30), (1000, -38), (1600, -48), (4500, -53), (9500, -53), (11500, -64),
                   (16000, -71)]
    noise_db = -62.3
    whine_hz, whine_db = 6140, -88.5  # thin electrical whine
    mid, side = (unit(colour(rng.standard_normal(N), room_colour)) for _ in range(2))
    side = colour(side, [(200, spread_db), (2000, -2)])
    noise = undb(noise_db) * np.array([mid + side, mid - side])
    hum = narrow_noise(np.full(N, float(hum_hz)), float(hum_width_hz))
    whine = np.sqrt(2) * np.sin(2 * np.pi * whine_hz * TIME)
    return noise + undb(hum_db) * hum + undb(whine_db) * whine


def scene(knock_side_db=-0.1):
    """Superposition of all sources; independent antiphase renditions of the tin's sound widen the image."""
    # where the tin stands: t/s, left minus right level/dB
    place = [(1.2, -0.5), (3.2, 2), (4.2, 1), (4.8, -0.5), (5.8, -0.5), (6.6, -1)]
    # left-right difference of the tin's sound: f/Hz, level/dB
    width_colour = [(300, -19.5), (1000, -11), (2200, -11.5), (4000, -21.5), (8000, -24)]
    pressure, drive = stirring()
    place_db = curve(place)
    stirred = scrape(pressure, drive) + sing() + squelch(drive) + slosh() + pops()
    tin = pan(stirred + drag() + catches(), place_db)
    side = colour(scrape(pressure, drive) + drag() + knocks(), width_colour) * np.array([[1], [-1]])
    struck = pan(knocks(), place_db + knock_side_db)
    return garage(tin + side + struck + handling() + pan(bumps(), -0.72)) + ambience()


def record(dry):
    """Band limiting: a steep elliptic low-pass removes the top above 15.8 kHz."""
    return signal.sosfilt(signal.ellip(8, .2, 70, 15800, fs=SR, output="sos"), dry)


dry = scene()
out = record(dry)
to_wav(out)
```